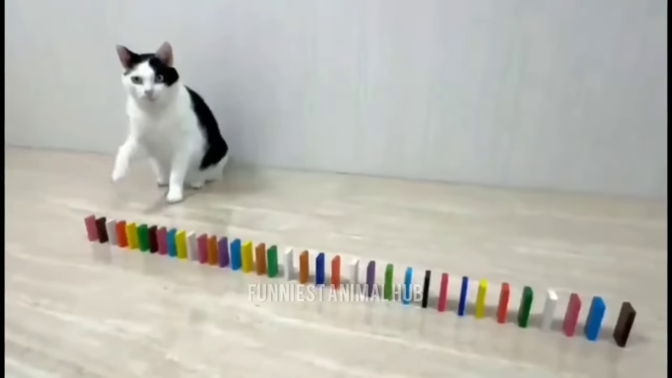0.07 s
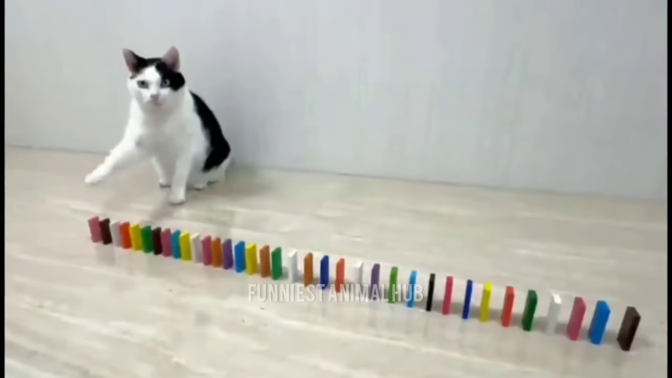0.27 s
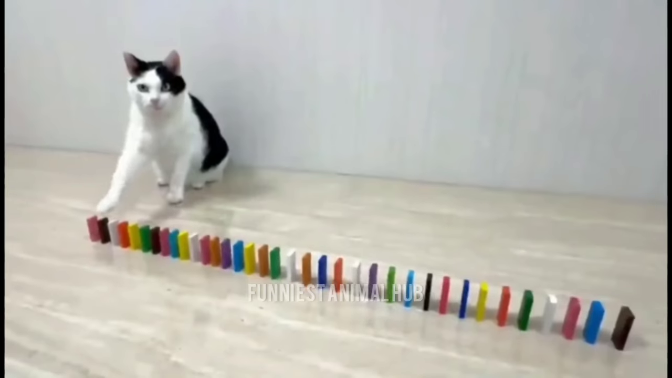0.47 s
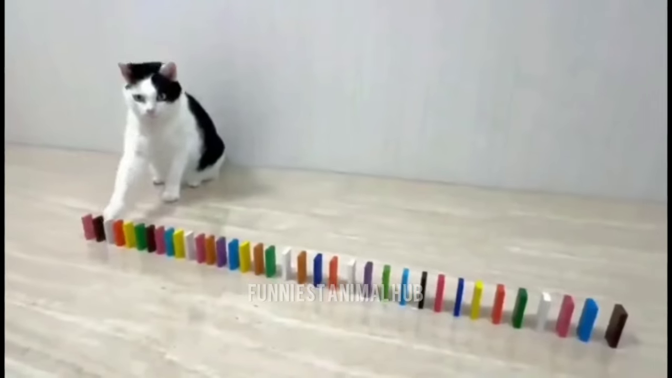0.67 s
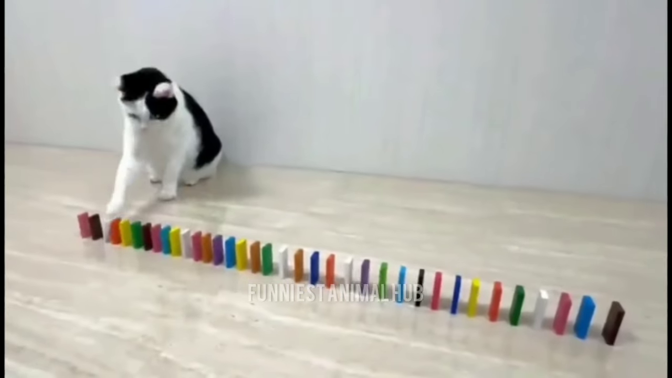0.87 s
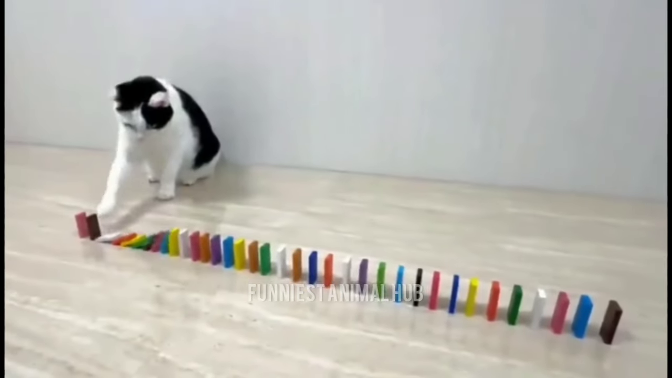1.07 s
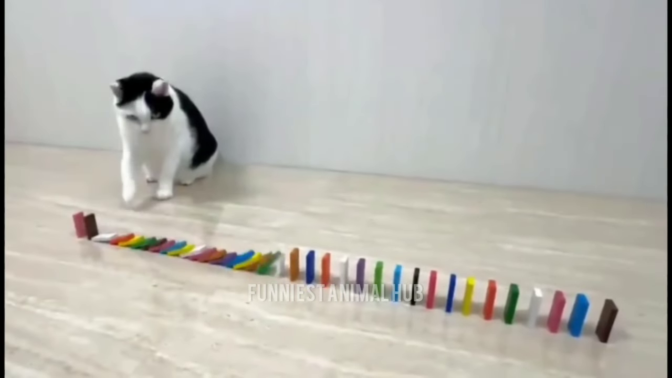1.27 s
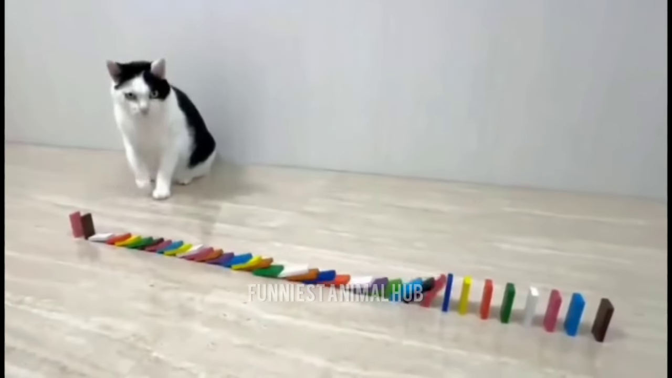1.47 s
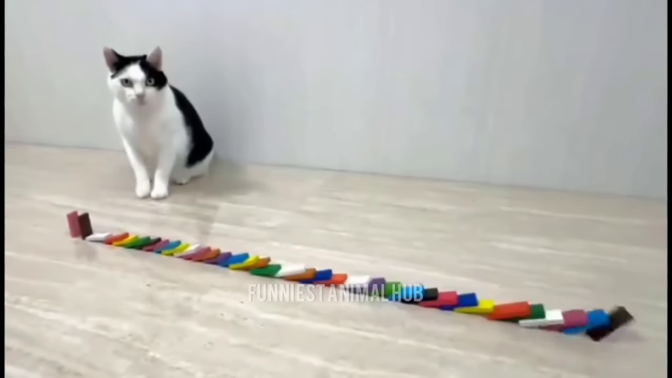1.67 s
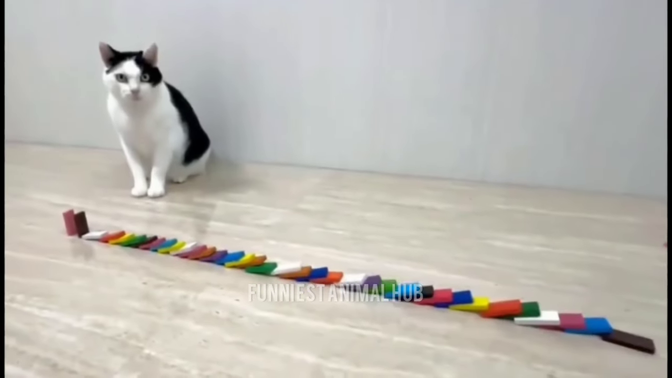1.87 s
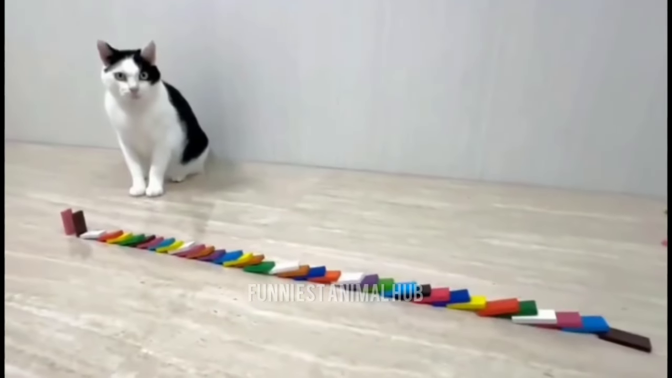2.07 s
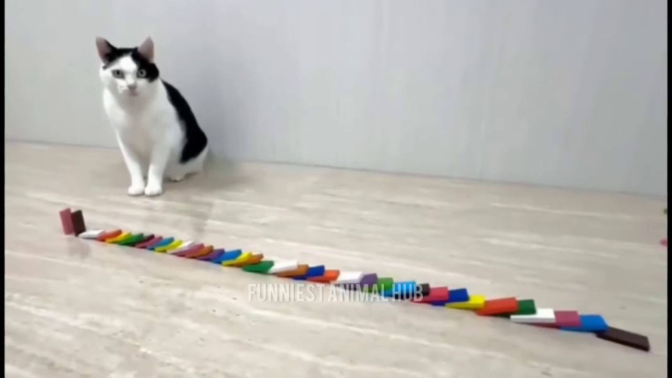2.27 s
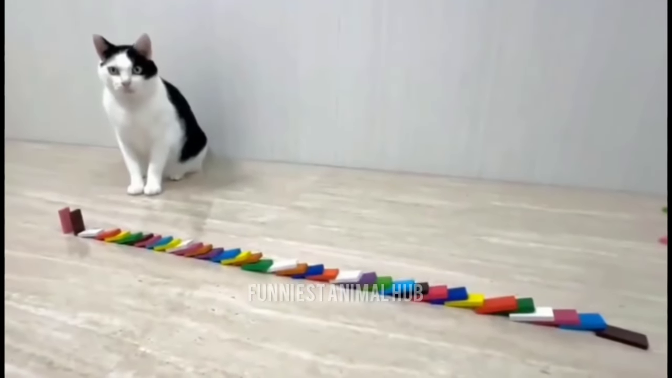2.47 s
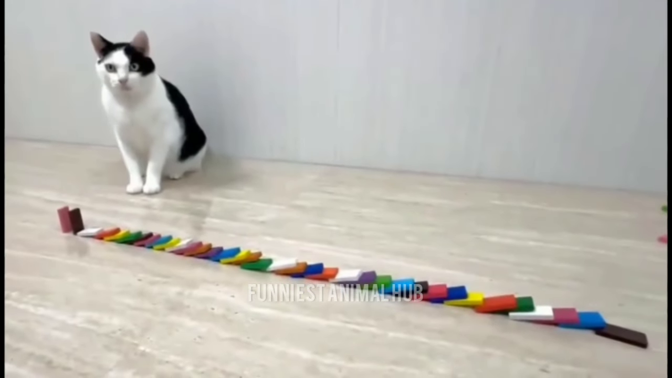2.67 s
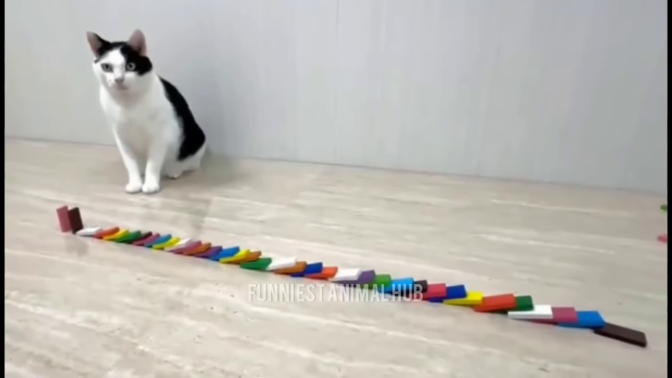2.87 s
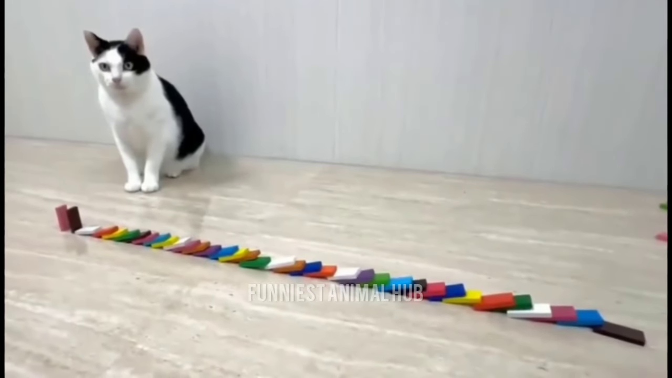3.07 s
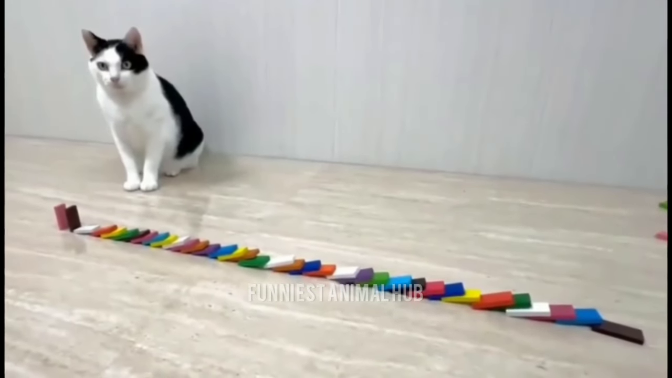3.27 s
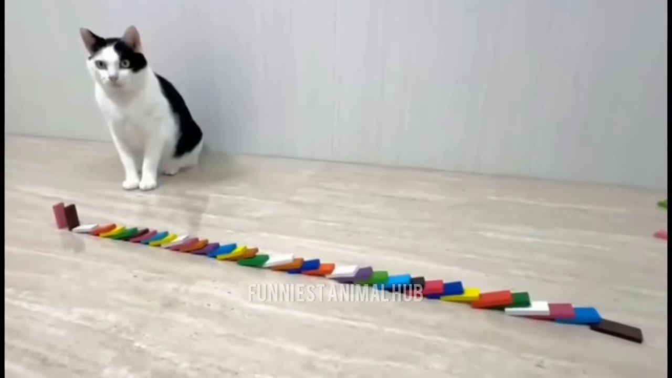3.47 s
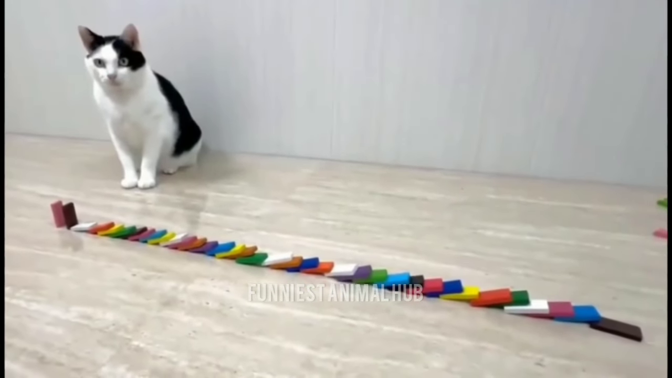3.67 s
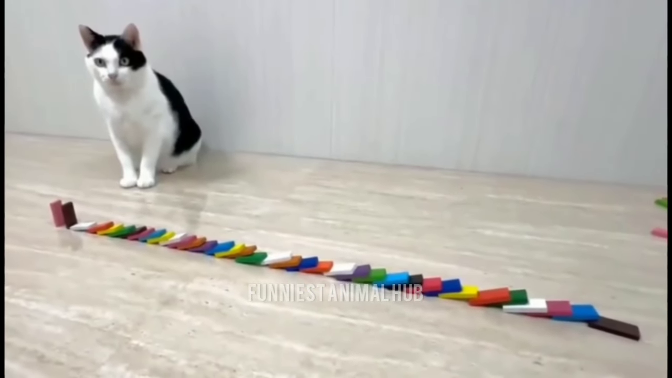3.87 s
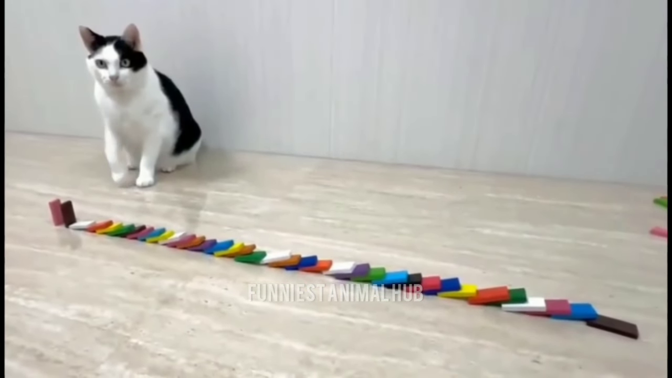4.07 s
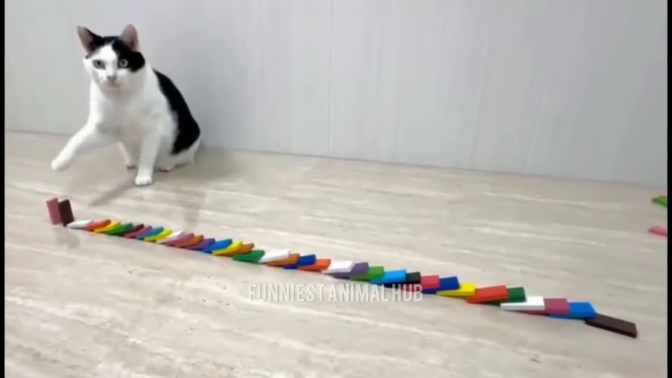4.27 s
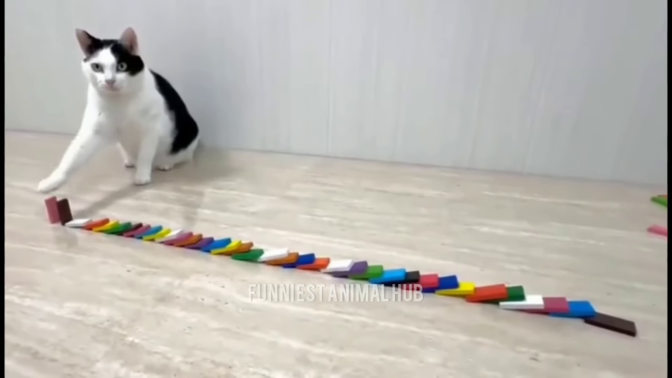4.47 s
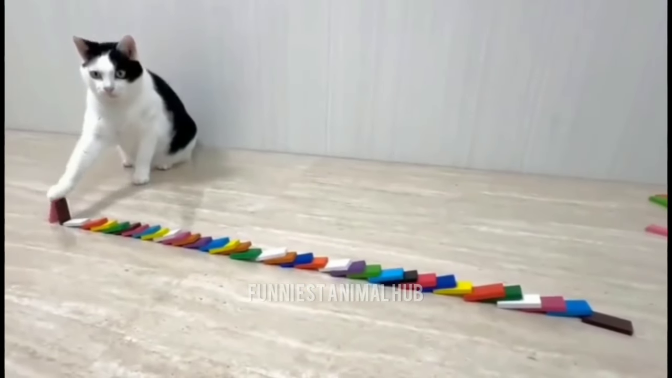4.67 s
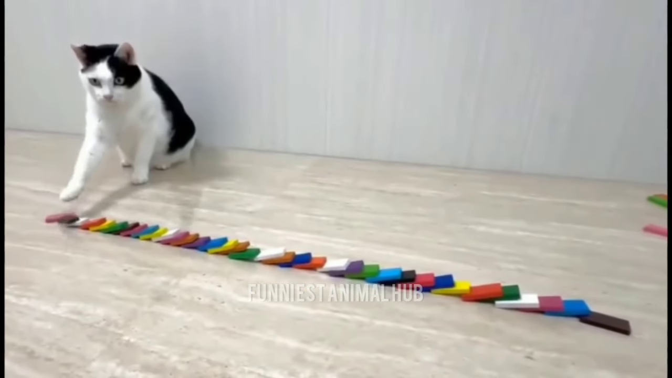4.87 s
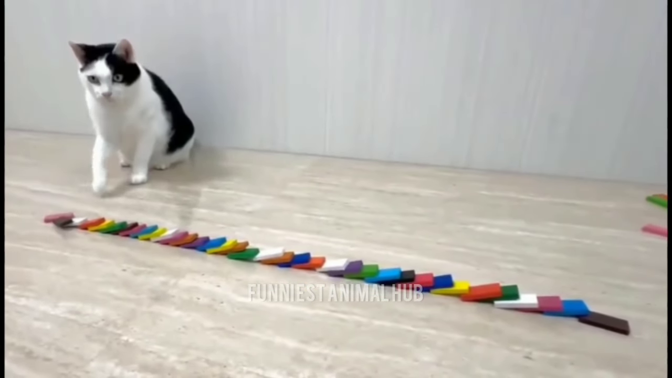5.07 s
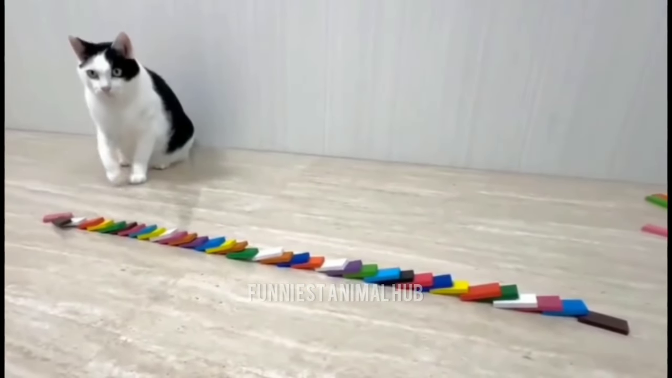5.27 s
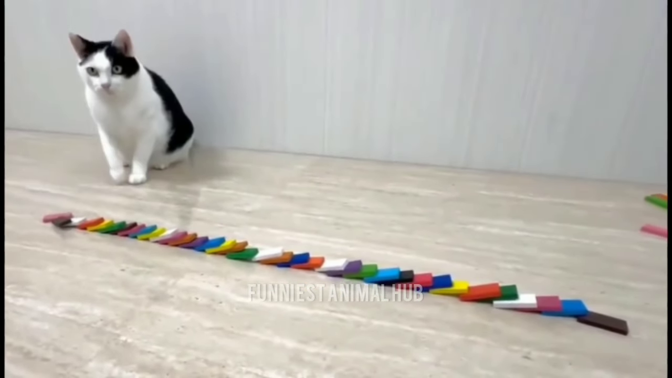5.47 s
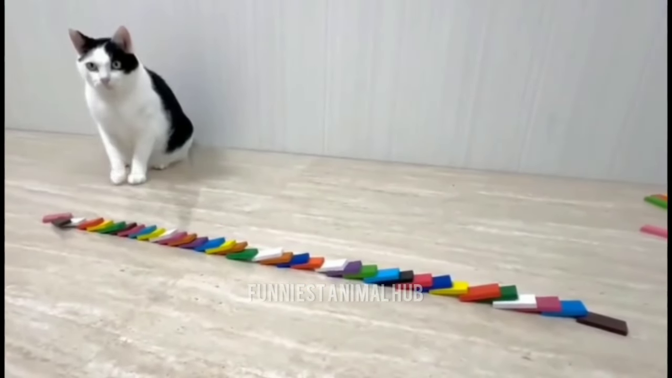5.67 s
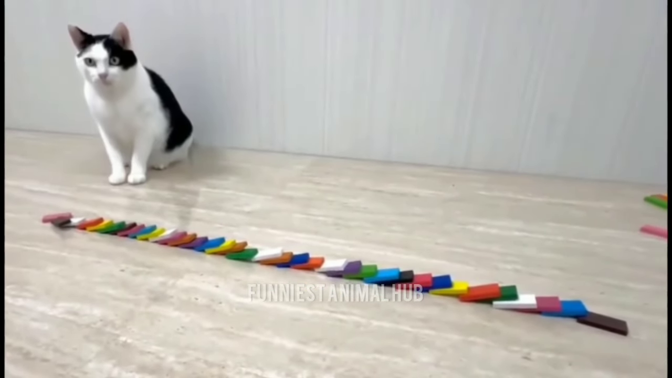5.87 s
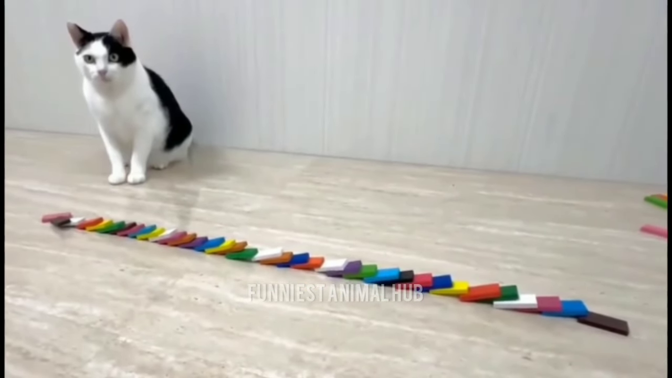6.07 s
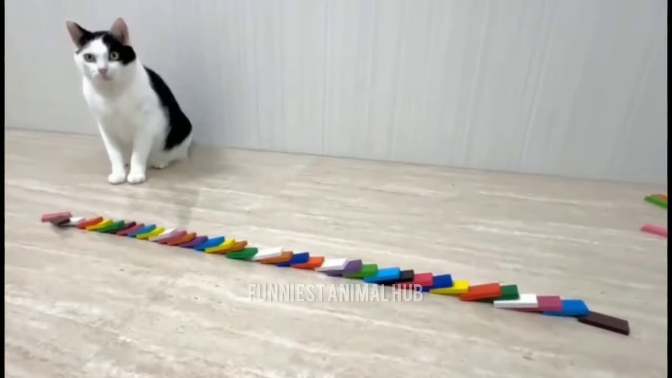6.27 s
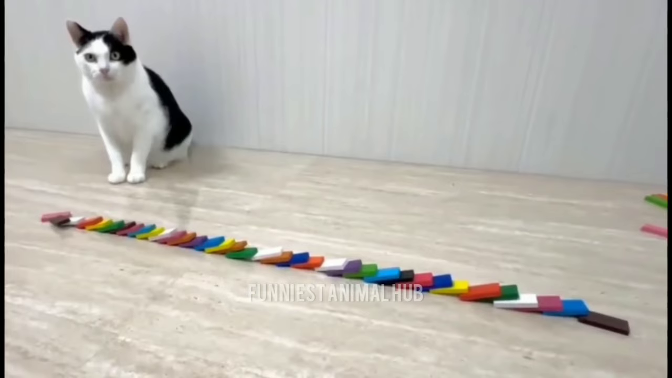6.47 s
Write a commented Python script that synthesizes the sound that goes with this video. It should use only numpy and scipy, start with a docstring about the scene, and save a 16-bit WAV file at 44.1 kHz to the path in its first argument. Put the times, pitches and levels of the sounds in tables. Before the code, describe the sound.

In a bare echoing room with a low hum, a row of wooden tiles falls in a fast clacking run; seconds later the last few drop.

```python
"""Bare, echoing room with a hard floor; a phone with two microphones listens from a couple of metres.
From the start an appliance nearby hums and rushes with air; a fainter mid whoosh sinks in the first second.
From 1.2 s a row of small wooden tiles topples: each knock rings a tile and thumps the floor panel,
ticks fill the gaps, boards boom below, and the walls smear the knocks into a rush.
At 5 s the last tiles drop in a shorter clatter; then the appliance is left alone."""
import sys
import numpy as np
from scipy import signal
from scipy.fft import rfft, irfft
from scipy.io import wavfile
from scipy.ndimage import uniform_filter1d

SR = 44100
rng = np.random.default_rng(int(sys.argv[2]) if len(sys.argv) > 2 else 0)


def field_ratio(decibels):
    """Amplitude ratio for a level in dB (20 dB per decade); scalars and array-likes work."""
    return 10 ** (np.asarray(decibels, dtype=float) / 20)


def transcribe(u):
    """Save the signal u as a 16-bit wav file named by the first command-line argument.

    u: samples, shape (n,) or (channels, n), limited to [-1, 1]; the rate is SR.
    q: integer samples, one column per channel.
    """
    v = np.clip(np.atleast_2d(u).T, -1, 1)
    q = np.round(v * 32767).astype(np.int16)
    wavfile.write(sys.argv[1], SR, q)


N = 287795
TIME = np.arange(N) / SR
HZ = np.fft.rfftfreq(N, 1 / SR)


def on_log(table, hz):
    """Read a (frequency, value) table on a log-frequency axis."""
    f, v = np.transpose(table)
    return np.interp(np.log(hz + 1), np.log(f), v)


def unit(x):
    """Scale to rms 1."""
    return x / np.sqrt(np.mean(x ** 2))


def bell(hz, centre_hz, octaves):
    """A smooth bump on a log-frequency axis."""
    return np.exp(-.5 * (np.log2((hz + 1) / centre_hz) / octaves) ** 2)


def ring(hz, db, t60, seconds):
    """Rows of modes (events x modes) summed into one decaying sound per event."""
    t = np.arange(int(seconds * SR)) / SR
    swing = np.sin(2 * np.pi * hz[..., None] * t)
    decay = np.exp(-np.log(1000) * t / t60[..., None])
    return np.sum(field_ratio(db)[..., None] * swing * decay, axis=1)


# tiles knocking onto each other: (time [s], level [dB], strongest ring [Hz])
KNOCKS = [(1.2087, -31, 3370), (1.214, -32.5, 6300), (1.2404, -30.5, 2570), (1.2652, -23, 2700),
          (1.285, -21, 3500), (1.2934, -17, 2750), (1.319, -17, 2720), (1.325, -24, 3574),
          (1.387, -20.5, 4350), (1.397, -20.5, 5000), (1.409, -16.5, 2820), (1.4271, -22, 4540),
          (1.4376, -18.5, 2010), (1.488, -17, 3410), (1.5408, -17, 2160), (1.5598, -17.5, 7150),
          (1.5896, -15, 7700), (1.609, -25.5, 5730), (1.631, -14, 4100), (1.655, -23, 4130),
          (1.687, -17, 4130), (1.74, -17, 4120), (1.76, -16, 3445), (1.8, -20, 2213), (1.8757, -19, 4870),
          (1.924, -16.5, 4960), (1.9254, -16.5, 8470), (1.9716, -15.5, 5310), (2.042, -16, 6410),
          (2.056, -19.5, 6730), (2.061, -19.5, 4900), (2.075, -22, 4900), (2.108, -17, 6100),
          (2.125, -20, 6380), (5.013, -50, 1310), (5.039, -36.5, 3830), (5.068, -36.5, 4650),
          (5.083, -38.5, 3400), (5.117, -31, 4700), (5.1839, -16, 3930), (5.155, -15, 5590),
          (5.173, -22.5, 4140), (5.222, -16, 5400), (5.231, -22, 4350), (5.238, -24.5, 5470),
          (5.263, -21.5, 4740), (5.288, -27.5, 4390)]


def knocks():
    """Tiles folding onto each other: each contact rings a tile and lightly thumps the floor panel."""
    s, db, hz = np.transpose(KNOCKS)
    thump_db = np.full(len(s), -15.0)  # against the knock
    return landing(s, db, hz, thump_db, settle_s=0.006, ring_db=7)


# tiles hitting the bare floor flat, short and sharp:
# (time [s], level [dB], strongest ring [Hz], floor thump against the slap [dB])
SLAPS = [(2.04, -8.5, 3573, -10), (5.1275, -7, 4050, -24), (5.1432, -16, 6200, -25.5),
         (5.2059, -10, 3990, -24)]
SLAP_ROOM_DB, SLAP_ECHO_S = -8, .007  # feed to the room, and the extra delay of its first echoes


def slaps():
    """A flat face wakes the tile's modes more alike, pushes upper panel modes less and beams at the phone."""
    left, right, to_room = landing(*np.transpose(SLAPS), settle_s=0.005, ring_db=4, dull_db=-4.5)
    to_room = field_ratio(SLAP_ROOM_DB) * np.roll(to_room, int(SLAP_ECHO_S * SR))
    return np.vstack([left, right, to_room])


# contacts within one knock: (nominal share of the settling time [1], level against the knock [dB])
LANDING = [(0, -4.5), (.35, -1), (.65, -0.5), (1.05, -8.5)]
FACE_CONTACT = 1  # row of LANDING in which the face comes down
SOFT_BELOW_DB, SOFT_TILT_PER_DB = -22, .15  # softer knocks lose dB per octave for each dB less
DULLEST_DB = -11  # limit of that tilt, per octave


def landing(s, db, hz, thump_db, settle_s, ring_db, dull_db=0):
    """One hard landing is several contacts: the edge touches, the face slaps, the corners settle."""
    contacts = len(LANDING)
    share, step_db = np.tile(LANDING, (len(s), 1)).T
    s, db, hz, thump_db = (np.repeat(v, contacts) for v in (s, db, hz, thump_db))
    index = np.arange(len(s))
    share = share * (1 + .2 * rng.standard_normal(len(s)))
    # only the face pushes the panel
    thump_db = np.where(index % contacts == FACE_CONTACT, thump_db, -np.inf)
    tilt_db = SOFT_TILT_PER_DB * np.minimum(db - SOFT_BELOW_DB, 0)
    tilt_db = np.maximum(tilt_db, DULLEST_DB)[:, None]
    sounds = tiles(index // contacts, hz, tilt_db, ring_db)
    return blows(s + share * settle_s, db + step_db, thump_db, sounds, dull_db=dull_db)


# modes of a typical tile, before each is varied: (frequency [Hz], level [dB], t60 [s])
TILE = [(809, -6, 0.012), (1306, -4, 0.013), (1826, -3, 0.009), (2220, -3, 0.0043), (2655, -1, 0.0096),
        (3410, 1.5, 0.0076), (4027, 2.5, 0.0085), (4900, 1.5, 0.0071), (5707, -2, 0.007),
        (6520, 0.2, 0.011), (8115, -3, 0.012), (9160, -2, 0.01), (11490, -10.5, 0.01), (12900, -3.5, 0.006)]
CRACK_DB, CRACK_S = -10.5, 0.0017  # click noise gain for an untilted tile, and its time constant


def tiles(owner, main_hz=None, tilt_db=0, ring_db=0):
    """Every tile is cut differently and every contact lands elsewhere, so modes shift and share out anew; peak 1."""
    hz, db, t60 = np.transpose(TILE)
    chance = rng.standard_normal((len(owner), 4, len(TILE)))
    cut_hz, cut_db, spot_hz, spot_db = chance.transpose(1, 0, 2)
    hz = hz * (1 + .08 * cut_hz[owner])
    if main_hz is not None:
        # a tile of known ring: its nearest mode moves to that pitch and takes the others along
        nearest = np.abs(np.log(hz / main_hz[:, None])).argmin(axis=1)
        hz = hz * (main_hz / hz[np.arange(len(hz)), nearest])[:, None]
    hz = np.minimum(hz * (1 + .025 * spot_hz), .45 * SR)
    db = db + 3.5 * cut_db[owner] + 3 * spot_db + tilt_db * np.log2(hz / 4000)
    if main_hz is not None:
        # less chance in the levels, and the known ring stands out
        db = db - 1.5 * spot_db + ring_db * bell(hz, main_hz[:, None], .45)
    sound = ring(hz, db, t60 + 0 * hz, .012)
    t = np.arange(sound.shape[1]) / SR
    # contact lasts a fraction of a millisecond
    sound = sound * (1 - np.exp(-t / 0.00034))
    sound = sound / np.abs(sound).max(axis=1, keepdims=True)
    # the broad click of first contact, fainter on dull tiles
    noise = np.diff(rng.standard_normal(sound.shape), prepend=0)
    crack = uniform_filter1d(noise, size=3) * np.exp(-t / CRACK_S)
    sound = sound + field_ratio(CRACK_DB + 2 * np.minimum(tilt_db, 0)) * crack
    return sound / np.abs(sound).max(axis=1, keepdims=True)


# where along the row the sound comes from: (time [s], lag of the left microphone [ms])
PLACE = [(1.2, -0.42), (2.1, 0.36), (5.0, -0.39)]


def blows(s, db, thump_db, sounds, scatter_ms=0.057, dull_db=0):
    """Tile sounds reach left microphone, right microphone and room (third row), with a panel thump in each."""
    out = np.zeros((3, N + sounds.shape[1]))
    lag_ms = np.interp(s, *np.transpose(PLACE)) + scatter_ms * rng.standard_normal(len(s))
    lag_s = lag_ms / 1000
    for row, sign in enumerate((.5, -.5, 0)):
        start = ((s + sign * lag_s) * SR).astype(int)
        np.add.at(out[row], start[:, None] + np.arange(sounds.shape[1]), field_ratio(db)[:, None] * sounds)
    return out[:, :N] + thumps(s, db + thump_db, dull_db)


# modes of the floor panel, before each spot varies them: (frequency [Hz], level [dB], t60 [s])
PANEL = [(208.7, -10.5, 0.049), (260, -14, .04), (316, -2.5, 0.11), (348.3, -1.5, 0.072),
         (402, -3.5, 0.057), (487, -3.5, 0.049), (666, 3.5, 0.028)]
SPOTS = 6


def thumps(s, db, dull_db):
    """Each blow lands on one of a few spots of the panel, which share its modes out differently."""
    out, spot = 0, rng.integers(SPOTS, size=len(s))
    hz, mode_db, t60 = np.transpose(PANEL)[:, None]
    # the deep modes span the whole panel; the upper ones depend more on the spot
    local = np.clip(hz / 600, 0, 1)
    dulling_db = dull_db * np.maximum(np.log2(hz / 320), 0)  # dull_db is per octave
    for k in range(SPOTS):
        pushes = np.zeros(N)
        np.add.at(pushes, (s[spot == k] * SR).astype(int), field_ratio(db[spot == k]))
        chance = rng.standard_normal((2, len(PANEL)))
        spot_hz = hz * (1 + 0.02766 * local * chance[0])
        spot_db = mode_db + 3.5 * local * chance[1] + dulling_db
        panel = ring(spot_hz, spot_db, t60, .3)[0]
        # the panel takes a few milliseconds to start swinging
        panel = panel * (1 - np.exp(-np.arange(len(panel)) / SR / 0.0011))
        out = out + signal.oaconvolve(pushes, panel / np.abs(panel).max())[:N]
    # a small panel radiates little below its lowest mode
    return signal.sosfilt(signal.butter(2, 160, "high", fs=SR, output="sos"), out)


# tiles jostling and sliding between the knocks, one curve per fall:
# (time [s], level [dB], brightness [dB per octave])
RATTLE = [
    [(1.21, -37.5, -3), (1.26, -48, -3), (1.29, -36, 0), (1.35, -32.5, 0.5), (1.44, -30, -2.5),
     (1.47, -33, -1), (1.53, -30, 4), (1.63, -28.5, 2), (1.72, -29.5, 2.5), (1.83, -35.5, -2),
     (1.915, -25.5, 5), (1.945, -34.5, -1.3), (2.02, -32, 3), (2.13, -36, 1), (2.16, -47, -2.5),
     (2.3, -63, -0.5)],
    [(5.04, -52.5, -5), (5.07, -53.5, -8), (5.115, -56.5, -2.5), (5.127, -34.5, -4.5), (5.138, -34, -6.5),
     (5.152, -39, 5.5), (5.195, -37, 3), (5.225, -30.5, 0), (5.31, -42, -1.5), (5.36, -48.5, 3),
     (5.46, -68, -7)],
]
# the panel answers most under the middle of the row: (time [s], floor thump against a tick [dB])
RATTLE_THUMP = [(1.25, -16), (1.58, -8.5), (1.84, -8.5), (2.13, -28), (5.11, -22), (5.14, -29)]
RATTLE_PER_S, TILES_PER_S = 340, 45  # ticks, and tiles taking turns to tick
SIZE_SPREAD_DB = 14  # tick levels range evenly over this span


def rattle():
    """Many small ticks of uneven size fill the time between the knocks."""
    out = 0
    for table in RATTLE:
        s, db, bright_db = np.transpose(table)
        length_s = s[-1] - s[0]
        chance = rng.random((int(RATTLE_PER_S * length_s), 2))
        at = s[0] + length_s * chance[:, 0]
        size_db = np.interp(at, s, db) + SIZE_SPREAD_DB * (chance[:, 1] - .65)
        # the ticks of one moment come from the tile that is falling
        owner = ((at - s[0]) * TILES_PER_S).astype(int)
        ticks = tiles(owner, tilt_db=np.interp(at, s, bright_db)[:, None])
        # ticks at this rate add up to rms 1
        ticks = ticks / np.sqrt(np.sum(ticks ** 2, axis=1, keepdims=True) * RATTLE_PER_S / SR)
        thump_db = np.interp(at, *np.transpose(RATTLE_THUMP))
        # ticks come from all over the fallen stretch and off the floor, so their lags scatter
        out = out + blows(at, size_db, thump_db, ticks, scatter_ms=0.2)
    return out


# modes of the boards under the panel: (frequency [Hz], level [dB], t60 [s])
BOARDS = [(58, -4, .1), (74, 0, .13), (98, -5, .12)]
# how hard the falling row shakes the boards: (time [s], level [dB])
BOOM = [(1.22, -64.5), (1.41, -44.5), (1.55, -44), (1.78, -45), (1.86, -55.5), (2.0, -48.5), (2.07, -40.5),
        (2.17, -60.5), (2.3, -79), (5.1, -81), (5.24, -46), (5.4, -79.5)]


def boom():
    """Dense, soft pushes of the falling row keep the boards under the panel swinging."""
    boards = ring(*np.transpose(BOARDS)[:, None], .4)[0]
    pushes = irfft(rfft(rng.standard_normal(N)) * bell(HZ, 72, .45), N)
    swing = unit(signal.oaconvolve(pushes, boards)[:N])
    return field_ratio(np.interp(TIME, *np.transpose(BOOM))) * swing


ROOM_DB, ROOM_SPOT_S = 0.5, .12  # echo level; the fall moves on to a place with other echoes in this time


def room(dry):
    """Every stretch of the row has echoes of its own; neighbouring stretches blend."""
    hop = int(ROOM_SPOT_S * SR)
    out, blend = np.zeros((2, 2 * N)), np.sin(np.pi * np.arange(2 * hop) / (2 * hop))
    for start in range(0, N - 2 * hop, hop):
        piece = dry[:, start:start + 2 * hop] * blend
        if np.abs(piece).max() > 1e-5:  # skip silent stretches
            wet = signal.fftconvolve(piece, echoes(), axes=1)
            out[:, start:start + wet.shape[1]] += wet
    return field_ratio(ROOM_DB) * out[:, :N]


# decay of the bare room: (frequency [Hz], t60 [s])
ROOM = [(100, 0.25), (300, 0.5), (700, 0.15), (1800, 0.35), (3200, 0.57), (4800, 0.57), (6800, 0.27),
        (10000, 0.091)]
ROOM_GAP_S = 0.00055  # silence before the echoes, which then rise over the same time
ROOM_GRAIN_DB = 2  # scales the random unevenness by which reflections stand out of the tail


def echoes(size=32768):
    """Dense, uneven echoes from bare walls for one place on the floor, each octave dying at its own pace."""
    bins, t = np.fft.rfftfreq(size, 1 / SR), TIME[:size]
    noise, tail = diffuse(bins), 0
    for hz in 60 * 2. ** np.arange(9):
        band = irfft(noise * bell(bins, hz, 0.9), size)
        tail = tail + band * np.exp(-np.log(1000) * t / on_log(ROOM, hz))
    grain = uniform_filter1d(np.repeat(rng.standard_normal(size // 128), 128), size=64)
    tail = tail * np.clip(t / ROOM_GAP_S - 1, 0, 1) * field_ratio(ROOM_GRAIN_DB * grain)
    return tail / np.sqrt(np.sum(tail ** 2) / 2)


# likeness of the two microphones in diffuse sound: (frequency [Hz], correlation [1])
ALIKE = [(60, 1), (280, .86), (620, 0.23), (1300, 0.011)]


def diffuse(hz=HZ):
    """Spectra of two noises, alike in the bass and unrelated in the treble."""
    c = np.clip(on_log(ALIKE, hz), 0, 1)
    mid, side = rfft(rng.standard_normal((2, 2 * len(hz) - 1)))
    return np.sqrt((1 + c) / 2) * mid + np.sqrt((1 - c) / 2) * side * np.array([[1], [-1]])


def walk(rate):
    """Random levels held 1 / rate s and slewed twice; spread near 1."""
    k = int(SR / rate)
    steps = np.repeat(rng.standard_normal(N // k + 1), k)
    return 1.351 * uniform_filter1d(uniform_filter1d(steps, k), k)[:N]


# hum lines of the appliance, about which they waver: (frequency [Hz], level [dB])
HUM = [(49.5, -66.5), (99.5, -71.5), (152, -67), (198, -58.5), (242, -72), (708, -75.5)]


def hum():
    """Motor lines, each wavering in level and pitch, the same at both microphones."""
    out = 0
    for hz, db in HUM:
        level = np.sqrt(2) * field_ratio(db + 3 * walk(10))
        cycles = np.cumsum(hz * (1 + 0.00812 * walk(7.7))) / SR
        out = out + level * np.sin(2 * np.pi * cycles)
    return out


# spectrum of the air noise as heard, closing steeply above about 10.3 kHz:
# (frequency [Hz], relative level [dB])
AIR = [(18, -53), (30, -17.5), (92, 0), (110, 1), (124, -11), (197, -2), (222, -14), (329, -14),
       (577, -18.5), (718, -10.5), (852, -16.5), (1260, -18), (3270, -46.5), (5730, -30.5), (10300, -46),
       (13400, -88), (22000, -120)]
# its balance between the microphones: (frequency [Hz], left minus right [dB])
AIR_BALANCE = [(60, 4.5), (110, -2), (200, 7), (370, 3), (680, 7), (1240, 1), (2270, -2.5), (4150, 12.5),
               (7610, 6), (13900, -22.5)]
AIR_DB = -52.5  # rms of the air noise where it leaves air_noise()


def air_noise():
    """Coloured diffuse noise whose octave bands flicker a little."""
    tilt = on_log(AIR_BALANCE, HZ) / 2
    spectrum = diffuse() * field_ratio(on_log(AIR, HZ) + np.array([tilt, -tilt])) * (HZ > 25)
    out = 0
    for hz in 30 * 2. ** np.arange(10):
        out = out + field_ratio(0.64 * walk(11.0)) * irfft(spectrum * bell(HZ, hz, 0.84), N)
    return field_ratio(AIR_DB) * unit(out)


# a fainter mid whoosh that sinks at the start: (time [s], level [dB])
WHOOSH = [(0, -58), (.4, -61), (1.1, -67), (3, -65), (4, -68.5)]


def whoosh():
    """Diffuse noise in a bump around 1600 Hz, following the level curve."""
    noise = unit(irfft(diffuse() * bell(HZ, 1600, 0.7), N))
    return field_ratio(np.interp(TIME, *np.transpose(WHOOSH))) * noise


def appliance():
    """Motor hum, air noise and the mid whoosh together."""
    return hum() + air_noise() + whoosh()


# balance of the tiles, panel and echoes: (frequency [Hz], left minus right [dB])
TILE_BALANCE = [(200, 0), (600, 3), (1300, -0.44), (5000, 1.5), (9000, -1)]


def scene():
    """Tiles, their room, the floor and the appliance."""
    dry = knocks() + slaps() + rattle()
    tilt = on_log(TILE_BALANCE, HZ) / 2
    heard = irfft(rfft(dry[:2] + room(dry[2:])) * field_ratio(np.array([tilt, -tilt])), N)
    return heard + boom() + appliance()


def band_limit(x):
    """A steep low-pass at the top of the band."""
    return signal.sosfilt(signal.butter(12, 14540, fs=SR, output="sos"), x)


# overall colour of all that is heard, thin in the deep bass, with a narrow dip near 7.6 kHz
# and a fall above 10.7 kHz: (frequency [Hz], level [dB])
COLOUR = [(25, -12.5), (45, -7), (70, -0.5), (7100, 0), (7600, -10.5), (8100, -1), (10200, -1), (10700, -3),
          (14000, -18.5)]


def record(dry):
    """The overall colour is applied, and the sound fades in from silence between 0.063 and 0.1 s."""
    fade = np.clip((TIME - 0.063) / (0.1 - 0.063), 0, 1) ** 4
    heard = irfft(rfft(dry) * field_ratio(on_log(COLOUR, HZ)), N)
    return band_limit(heard * fade)


dry = scene()
out = record(dry)
transcribe(out)
```